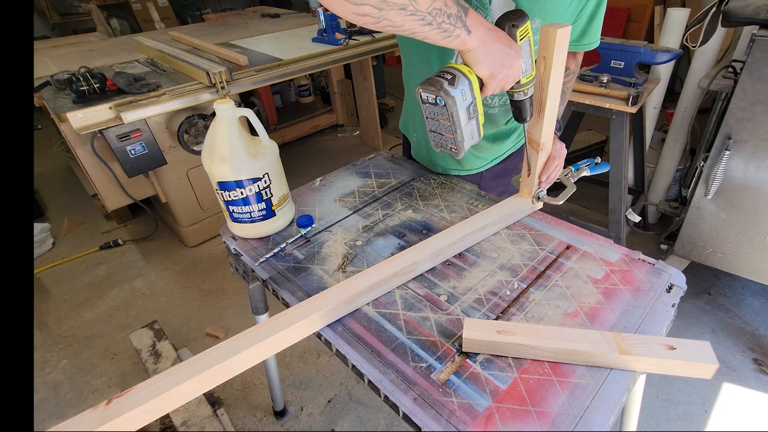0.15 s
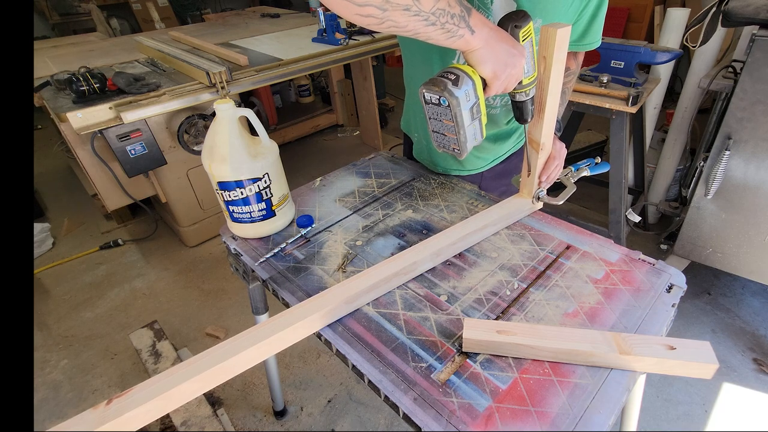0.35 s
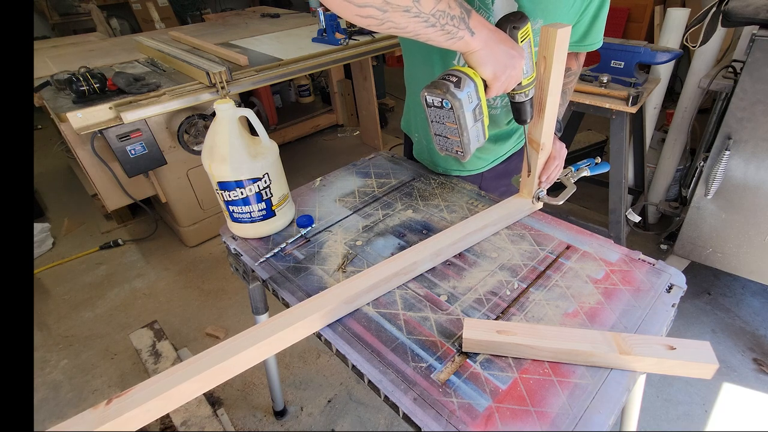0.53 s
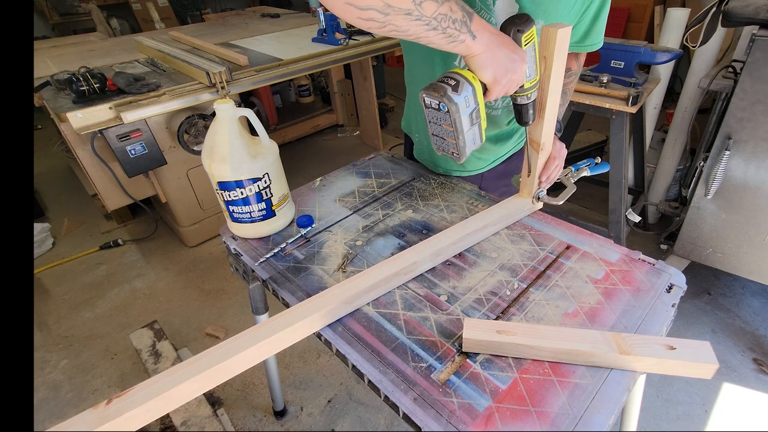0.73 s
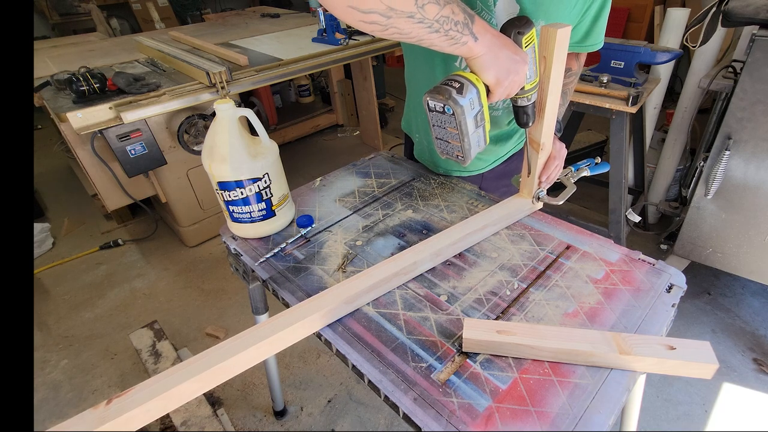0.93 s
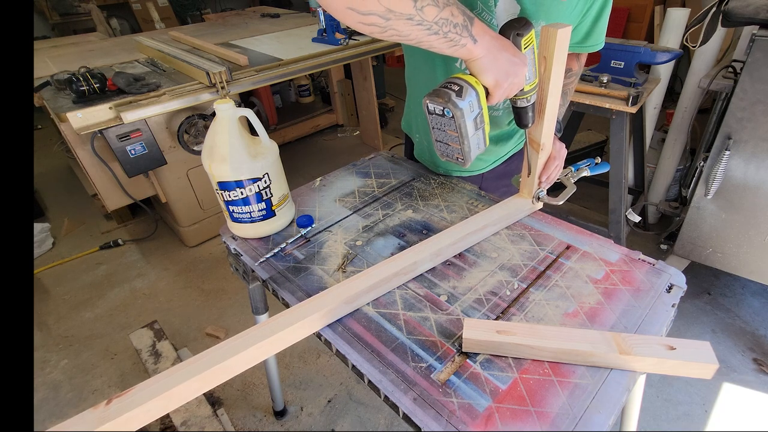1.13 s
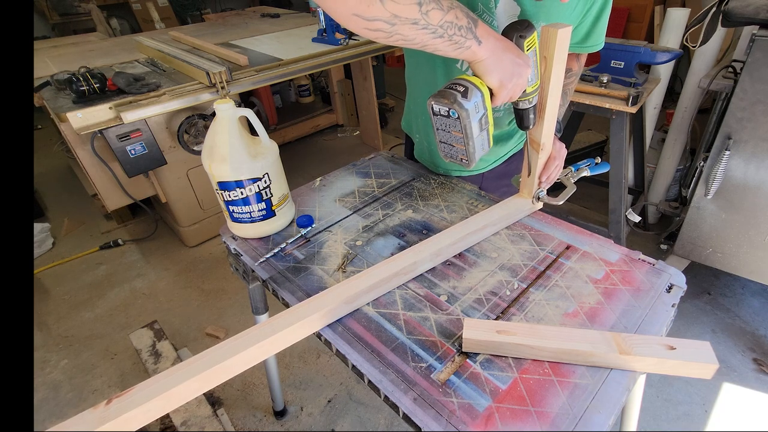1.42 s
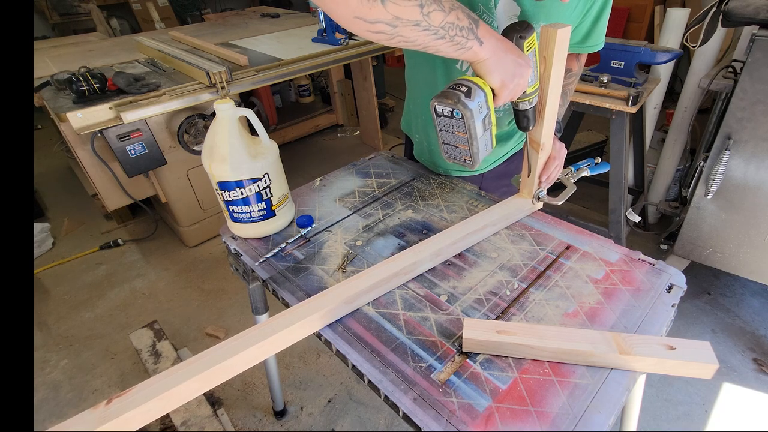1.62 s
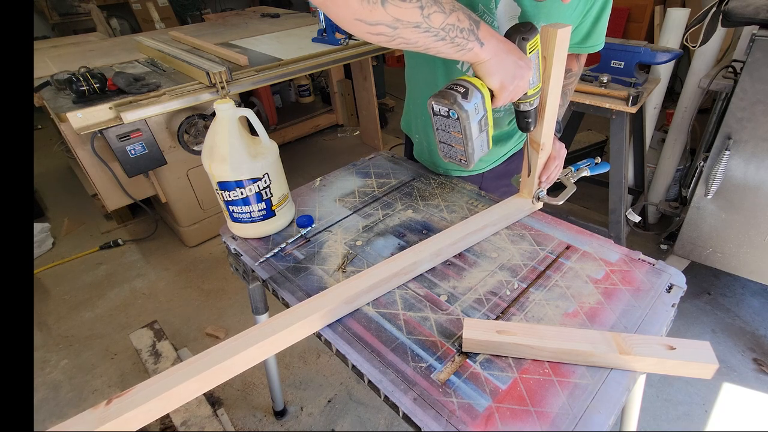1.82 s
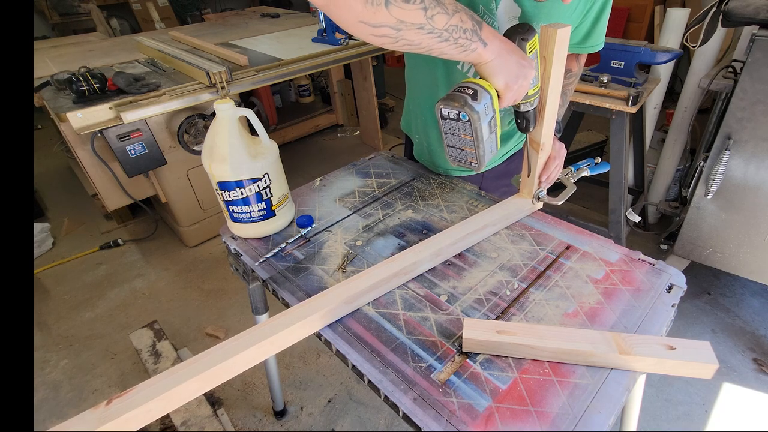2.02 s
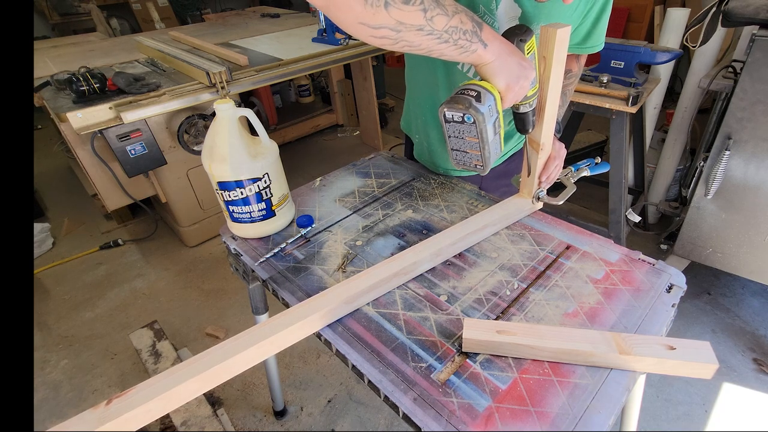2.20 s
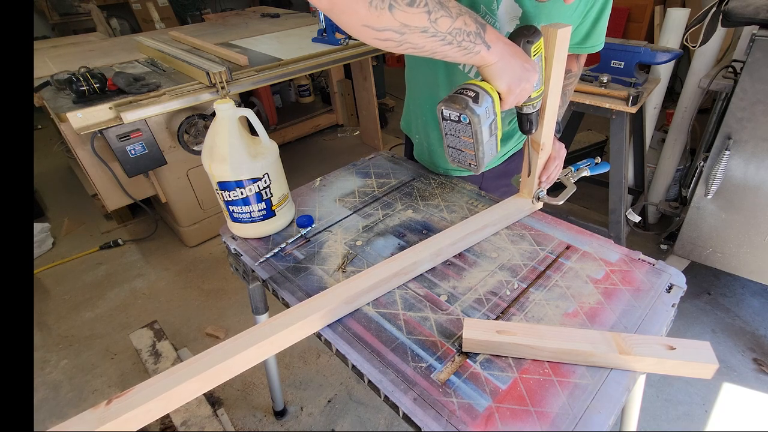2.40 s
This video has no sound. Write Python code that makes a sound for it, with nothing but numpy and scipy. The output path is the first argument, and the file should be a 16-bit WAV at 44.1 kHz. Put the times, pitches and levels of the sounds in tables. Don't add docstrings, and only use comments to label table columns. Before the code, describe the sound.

A cordless drill driver is pulsed in seven short whirring bursts against a wooden frame in a workshop.

```python
import sys
import numpy as np
from scipy import signal
from scipy.fft import rfft, irfft
from scipy.io import wavfile
from scipy.ndimage import uniform_filter1d, minimum_filter1d

SR = 44100
rng = np.random.default_rng(int(sys.argv[2]) if len(sys.argv) > 2 else 0)


def gain_from_decibels(decibels):
    exponent = np.asarray(decibels, float) / 20
    return 10 ** exponent


def master_out(mix):
    frames = np.transpose(np.atleast_2d(mix))
    ceiling = np.clip(frames, -1, 1)
    pcm = np.round(ceiling * 32767).astype(np.int16)
    wavfile.write(sys.argv[1], SR, pcm)


N = 112454


def rms_one(x):
    return x / np.sqrt(np.mean(x ** 2) + 1e-20)


def at_hz(points):
    hz, value = np.array(points).T
    bins_hz = np.arange(N // 2 + 1) * SR / N
    return np.interp(np.log(bins_hz + 1), np.log(hz), value)


def colour(x, spectrum):
    return rms_one(irfft(rfft(x) * gain_from_decibels(at_hz(spectrum)), N))


def low_pass(x, order, hz):
    return signal.sosfilt(signal.butter(order, hz, fs=SR, output="sos"), x)


def drift(rate_hz):
    r = np.exp(-2 * np.pi * rate_hz / SR)
    wander = signal.lfilter([1], [1, -2 * r, r * r], rng.standard_normal(N + SR))
    return rms_one(wander[SR:])


def resonate(x, peaks):
    out = 0
    for k, (hz, width_hz, db) in enumerate(peaks):
        r = np.exp(-np.pi * width_hz / SR)
        zeros = [(1 - r * r) / 2, 0, (r * r - 1) / 2]
        poles = [1, -2 * r * np.cos(2 * np.pi * hz / SR), r * r]
        out = out + (-1) ** k * gain_from_decibels(db) * signal.lfilter(zeros, poles, x + 1e-18)
    return out


def near_top(mesh_hz):
    top_hz = -minimum_filter1d(-mesh_hz, size=11000)
    return mesh_hz / top_hz


# (time [s], gear-mesh rate [Hz])
SQUEEZES = [
    [(0.185, 251.4), (0.203, 466.3), (0.231, 738), (0.261, 1011), (0.307, 1136), (0.357, 941), (0.385, 554),
     (0.405, 305)],
    [(0.515, 264), (0.531, 453), (0.555, 709), (0.609, 1264), (0.645, 1425), (0.687, 1346), (0.741, 826),
     (0.775, 421)],
    [(0.838, 264.4), (0.852, 501), (0.874, 843.6), (0.908, 1302), (0.956, 1609), (0.992, 1653),
     (1.068, 900.5), (1.095, 474)],
    [(1.175, 261.3), (1.187, 492), (1.211, 910), (1.273, 2422), (1.311, 2783), (1.383, 1532),
     (1.431, 637.7), (1.455, 301)],
    [(1.565, 253.5), (1.579, 531.4), (1.601, 955.0), (1.659, 1617), (1.709, 1738), (1.757, 1004),
     (1.781, 650.3), (1.8, 380.5)],
    [(1.888, 248.4), (1.9, 448.8), (1.92, 780.3), (1.95, 1332), (1.982, 1581), (2.022, 1560),
     (2.076, 832.5), (2.105, 411.6)],
    [(2.21, 254.1), (2.224, 486.4), (2.248, 881.5), (2.278, 1314), (2.336, 1430), (2.358, 1277),
     (2.398, 758), (2.42, 396)],
]
# (time [s], gear-mesh rate [Hz])
LAST_SQUEEZE = [
    (2.538, 250),
    (2.6, 1000),
]
SQUEEZE_DB = [
    -28,
    -27,
    -26.5,
    -25.5,
    -26,
    -26.5,
    -27,
    -23,
]


def motor():
    attack_s, release_s, loud_grows = 0.018, 0.035, 0.66
    t = np.arange(N) / SR
    mesh_hz, gain = np.full(N, 250.), np.zeros(N)
    for squeeze, db in zip([*SQUEEZES, LAST_SQUEEZE], SQUEEZE_DB):
        s, hz = np.transpose(squeeze)
        on = (t >= s[0]) & (t < s[-1])
        mesh_hz[on] = np.interp(t[on], s, hz)
        rise = np.minimum((t[on] - s[0]) / attack_s, 1)
        fall = np.minimum((s[-1] - t[on]) / release_s, 1)
        gain[on] = gain_from_decibels(db) * (rise * fall) ** 1.94 * (mesh_hz[on] / 1400) ** loud_grows
    return uniform_filter1d(mesh_hz, size=600), np.abs(uniform_filter1d(gain, size=200))


MESH_PER_TURN = 4.62
# (multiple, level [dB])
MESH_HARMONICS = [(1, -5), (2, -8.5), (3, -6.5), (4, -10.5)]
# (frequency [Hz], width [Hz], level [dB])
HOUSING_PEAKS = [(1031, 111, -9.5), (1575, 67, -6), (1883, 63, -15), (2518, 190, 0.5), (3293, 560, -3.5),
                 (3948, 600, -2), (4162, 190, 0), (4700, 83, -11), (5290, 100, -20)]


def gear_tones(mesh_hz, gain):
    flutter_db, wobble, turn_beat, leak_db = 4.0, 0.005, 0.45, -28.5
    phase = 2 * np.pi * np.cumsum(mesh_hz * (1 + wobble * drift(62.3))) / SR
    tones = sum(gain_from_decibels(db + flutter_db * drift(59)) * np.sin(k * phase) for k, db in MESH_HARMONICS)
    tones *= gain * (mesh_hz / 1400) ** 0.31 * near_top(mesh_hz) ** 1.77
    tones *= 1 + turn_beat * np.sin(phase / MESH_PER_TURN / 2)
    return 2 * resonate(tones, HOUSING_PEAKS) + gain_from_decibels(leak_db) * tones


# (frequency [Hz], density [dB per Hz])
CLATTER_COLOUR = [(290, -29), (500, -13), (1300, -4.5), (1740, -6.5), (2330, -11.5), (4150, -4.5),
                  (7860, -10), (9090, -22.5), (16000, -18.5)]
# (frequency [Hz], width [Hz], level [dB])
SHELL_PEAKS = [(1725, 145, -1), (1909, 85, 6), (2732, 250, -6), (3227, 67, -2.5), (4220, 410, -15)]


def clatter(mesh_hz, gain):
    hiss_db, ring_db, flutter_db = -6, -5, 1.5
    impacts_per_mesh, size_spread_db = 11, 1.65
    speed = mesh_hz / 1400
    sizes = gain_from_decibels(size_spread_db * np.minimum(rng.exponential(1, N), 5)) * rng.choice([-1, 1], N)
    chance = np.clip(impacts_per_mesh * mesh_hz / SR, 0, 1)
    impacts = rms_one(sizes * (rng.random(N) < chance) / np.sqrt(chance))
    impacts = impacts * gain_from_decibels(flutter_db * drift(30))

    hiss = colour(impacts, CLATTER_COLOUR)
    dull = low_pass(hiss, 2, 4960)
    hiss = dull + (hiss - dull) * speed ** 0.35 * near_top(mesh_hz)

    steady_rms = np.sqrt(np.mean(resonate(impacts, SHELL_PEAKS) ** 2))
    ring = resonate(impacts * gain * speed ** -0.18, SHELL_PEAKS) / steady_rms
    ring = low_pass(ring, 4, 6900)
    return gain_from_decibels(hiss_db) * gain * hiss + gain_from_decibels(ring_db) * ring


# (frequency [Hz], width [Hz], level [dB])
FRAME_PEAKS = [(224, 55, -8), (284.2, 43.4, -2), (327.6, 14.4, 2.5), (409.4, 34.5, -7.5), (478.8, 27, -6.5)]


def frame(mesh_hz, gain):
    rotor_db, rough_db, lag_s = 1, -11, 0.016
    rotor = np.sin(2 * np.pi * np.cumsum(mesh_hz) / MESH_PER_TURN / SR)
    rotor = rotor * gain_from_decibels(rotor_db + 2.5 * drift(38)) * near_top(mesh_hz) ** 1.1
    rough = rng.standard_normal(N)
    rough = gain_from_decibels(rough_db) * rough / np.sqrt(np.mean(resonate(rough, FRAME_PEAKS) ** 2))
    r = np.exp(-1 / (lag_s * SR))
    lagged = np.abs(signal.lfilter([1 - r], [1, -r], gain))
    drive = gain_from_decibels(-28.5) * (lagged / gain_from_decibels(-27.5)) ** 0.79
    return resonate((rotor + rough) * drive, FRAME_PEAKS)


# (onset [s], peak level [dB], frequency [Hz])
WHINE_STARTS = [
    (.177, -51.5, 4890),
    (.509, -53, 5040),
    (.83, -47, 5100),
    (1.168, -46.5, 4970),
    (1.558, -49.5, 4830),
    (1.881, -48.5, 4670),
    (2.201, -50.5, 4518),
    (2.532, -54, 4680),
]


def whines():
    rise_s, fade_s, width_hz, octave_db = 0.0041, 0.17, 210, -24
    t, out, noise = np.arange(N) / SR, np.zeros(N), rng.standard_normal(N)
    for s, db, hz in WHINE_STARTS:
        since = np.maximum(t - s, 0)
        shape = (1 - np.exp(-since / rise_s)) * np.exp(-since / fade_s)
        band = [(hz, width_hz, 0)]
        tone = rms_one(resonate(resonate(noise, band), band))
        octave = tone ** 2 - uniform_filter1d(tone ** 2, size=20)
        out += gain_from_decibels(db) * shape * (tone + gain_from_decibels(octave_db) * octave)
    return out


# (frequency [Hz], left minus right [dB])
PORT_BALANCE = [(100, -12.5), (300, 5), (600, 0), (1400, -1.5), (2800, -1.5), (5600, -4), (9000, 3),
                (15000, 0.5)]
# (frequency [Hz], side minus mid [dB])
PORT_WIDTH = [(60, -17), (130, -70), (290, -10), (640, 1.5), (1410, -6.5), (3100, 1), (6820, 3),
              (15000, 0.5)]


def ports(x):
    lag_share, scatter_s = 0.58, 0.014
    near = np.arange(SR // 10) / SR
    scatter = rfft(rng.standard_normal(len(near)) * np.exp(-near / scatter_s), N)
    scatter /= np.sqrt(uniform_filter1d(np.abs(scatter) ** 2, size=1500))
    side = gain_from_decibels(at_hz(PORT_WIDTH)) * (-1j * lag_share + np.sqrt(1 - lag_share ** 2) * scatter)
    balance = gain_from_decibels(at_hz(PORT_BALANCE) * [[.5], [-.5]])
    return irfft(rfft(x) * (1 + side * [[1], [-1]]) * balance, N)


def shop(x):
    first_wall_s = 0.0092
    t = np.arange(SR) / SR
    noise = rng.standard_normal((2, SR)) * (t > first_wall_s)
    bass = low_pass(noise, 2, 550)
    dull = low_pass(noise, 6, 8700)
    # (band, level [dB], T60 [s])
    parts = [(bass, -12, 0.73), (dull - bass, -14.5, 0.53), (noise, -12.5, 0.3)]
    tail = sum(gain_from_decibels(db - 60 * t / t60) / np.sqrt(t60 * SR / 14) * part for part, db, t60 in parts)
    return signal.fftconvolve(tail, x[None], axes=1)[:, :N]


# (frequency [Hz], density [dB per Hz])
RUMBLE_COLOUR = [(12, -14), (20, -17), (65, 3), (83, -3), (119, -4), (145, -18), (170, -13.5), (220, 4),
                 (370, -120)]
# (frequency [Hz], density [dB per Hz])
HISS_COLOUR = [(130, -30), (200, -15), (500, -11.5), (830, -8.5), (1600, -19.5), (3700, -22), (5500, -47),
               (9000, -56)]


def background():
    rumble_db, flutter_db, hum_db, hiss_db = -49, -3, -49.5, -57.5
    tail_db, tail_t60_s = -47, 0.21
    rumble = colour(rng.standard_normal(N), RUMBLE_COLOUR)
    rumble = rumble * gain_from_decibels(rumble_db + 1.5 + flutter_db * drift(6.8))
    hum = resonate(rng.standard_normal(N), [(72, 21, 0)])
    rumble += gain_from_decibels(hum_db) * rms_one(hum)
    apart = colour(rng.standard_normal(N), RUMBLE_COLOUR) * gain_from_decibels(rumble_db - 15)
    mid, side = (colour(rng.standard_normal(N), HISS_COLOUR + [(12000, -75)]) for _ in range(2))
    hiss = gain_from_decibels(hiss_db) * (mid + side * [[1], [-1]])
    tail_colour = CLATTER_COLOUR[:-2] + [(9000, -56)]
    tail = np.array([colour(rng.standard_normal(N), tail_colour) for _ in range(2)])
    tail *= gain_from_decibels(tail_db - 60 * np.arange(N) / SR / tail_t60_s)
    return rumble * gain_from_decibels([[.4], [-.4]]) + apart * [[1], [-1]] + hiss + tail


def scene():
    mesh_hz, gain = motor()
    tool = gear_tones(mesh_hz, gain) + clatter(mesh_hz, gain) + frame(mesh_hz, gain) + whines()
    return ports(tool) + shop(tool) + background()


def band_limit(x):
    return signal.sosfilt(signal.butter(12, 16180, fs=SR, output="sos"), x)


def record(dry):
    top_cut = signal.cheby2(14, 60, 16050, fs=SR, output="sos")
    mix = signal.sosfilt(top_cut, dry)
    return band_limit(mix)


dry = scene()
out = record(dry)
master_out(out)
```